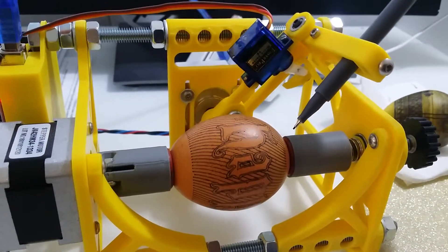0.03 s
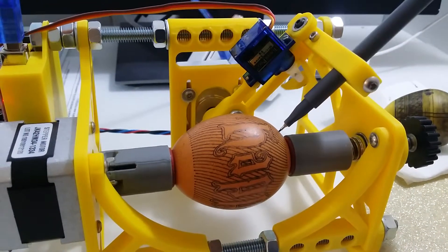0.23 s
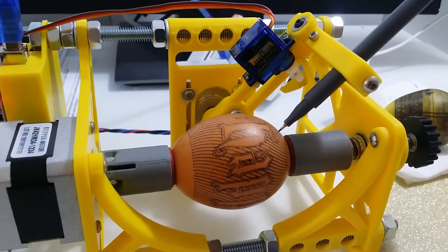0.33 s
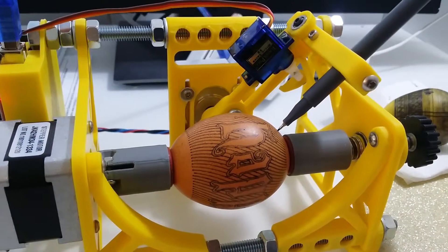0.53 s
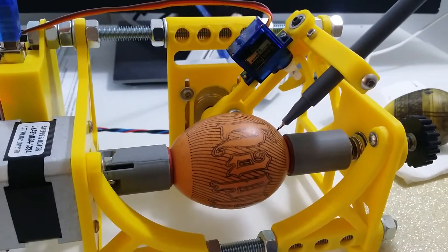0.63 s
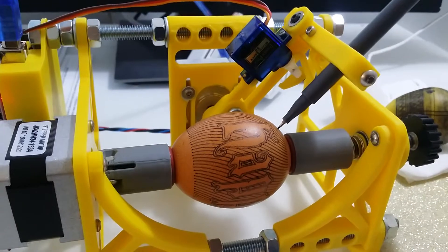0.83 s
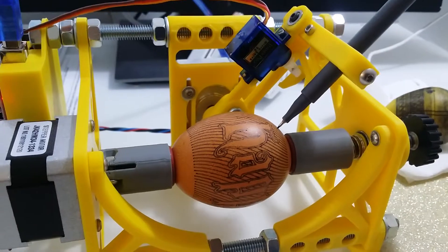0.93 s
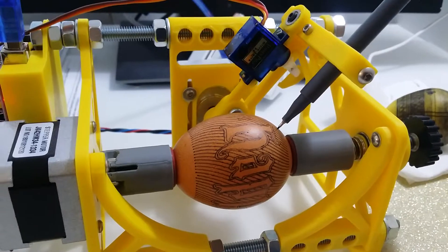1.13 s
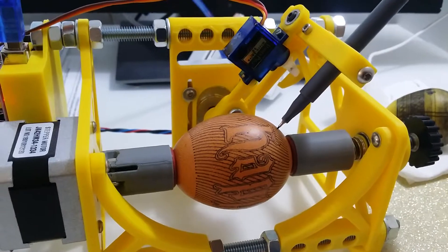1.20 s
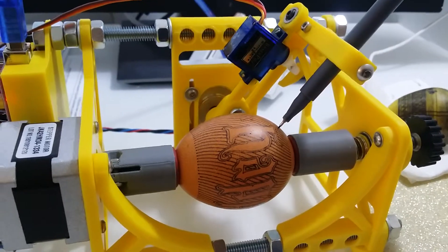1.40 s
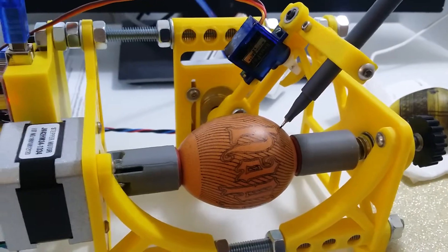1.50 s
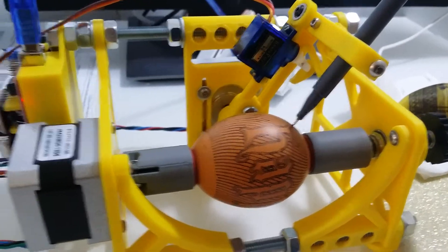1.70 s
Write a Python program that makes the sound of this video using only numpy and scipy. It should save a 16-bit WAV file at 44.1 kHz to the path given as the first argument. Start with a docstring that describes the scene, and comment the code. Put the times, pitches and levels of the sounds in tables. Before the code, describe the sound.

A little drawing machine's motors hum near the microphone. First comes a thin whine, then a quick gear buzz and a rattling thump as the pen lands, a short lull, and a steady two-note drone over quiet room hum.

```python
"""Drawing machine on an egg

A small plastic machine works close by on a table, over a steady hum like that of fans. One stepper
motor travels with the pen up, sounding harmonics of its step rate. A servo zips the pen down with
meshing gears; the arm thumps and bounces, exciting damped modes. After a pause two steppers draw
slowly together. An automatic gain control ducks at the zip and creeps back."""
import sys
import numpy as np
from scipy import signal
from scipy.fft import rfft, irfft
from scipy.io import wavfile
from scipy.ndimage import uniform_filter1d

SR = 44100
rng = np.random.default_rng(int(sys.argv[2]) if len(sys.argv) > 2 else 0)


def store_pcm(level_fs):
    """Save levels as 16-bit WAV."""
    pcm = np.round(np.clip(level_fs, -1, 1) * 32767).astype(np.int16)
    wavfile.write(sys.argv[1], SR, np.atleast_2d(pcm).T)


N = 77175
T = np.arange(N) / SR


def from_db(db):
    """The decibel scale: 20 dB is a factor of ten in amplitude."""
    return 10 ** (np.asarray(db) / 20)


def unit_rms(x):
    """Normalisation to a mean power of one."""
    return x / np.sqrt(np.mean(x ** 2) + 1e-20)


def pan(balance_db):
    """Constant-power panning; balance is the level of the left channel over the right."""
    ratio = from_db(np.atleast_1d(balance_db))
    return np.array([ratio, np.ones_like(ratio)]) * np.sqrt(2 / (1 + ratio * ratio))


def drift(corner_hz):
    """Random fluctuation: low-passed noise of unit power."""
    freqs = np.fft.rfftfreq(N, 1 / SR)
    return unit_rms(irfft(rfft(rng.standard_normal(N)) / (1 + (freqs / corner_hz) ** 2), N))


def decay(t60_s):
    """Exponential damping: the amplitude falls 60 dB in the time T60."""
    return np.exp(-np.log(1000) * T / t60_s)


def ring(force, hz, t60_s):
    """A damped oscillator, whose impulse response is a decaying sine."""
    radius, angle = np.exp(-np.log(1000) / (t60_s * SR)), 2 * np.pi * hz / SR
    return signal.lfilter([0, np.sin(angle)], [1, -2 * radius * np.cos(angle), radius ** 2], force + 1e-18)


def impulses(times_s, db):
    """Ideal impacts: a single sample at each time."""
    train = np.zeros(N)
    train[(times_s * SR).astype(int)] = from_db(db)
    return train


# Each row: frequency in Hz, correlation between the channels from 0 to 1.
COHERENCE = [(100, 1), (300, 0.67), (600, 0.42), (1200, 0.13), (3000, 0)]
def noise(spectrum):
    """Partly coherent stereo noise: long waves reach both ears alike, short ones do not."""
    log_f = np.log(np.fft.rfftfreq(N, 1 / SR) + 1)
    hz, db, balance_db = np.transpose(spectrum)
    coherence_hz, correlation = np.transpose(COHERENCE)
    coherence = np.interp(log_f, np.log(coherence_hz), correlation)
    mid, side = rfft(rng.standard_normal((2, N)))
    white = np.sqrt(1 + coherence) * mid + np.sqrt(1 - coherence) * side * [[1], [-1]]
    colour = from_db(np.interp(log_f, np.log(hz), db))
    balance = pan(np.interp(log_f, np.log(hz), balance_db))
    return irfft(white * colour * balance, N) * np.sqrt(SR) / 2


# The room's response. Each row: frequency in Hz, relative level in dB, balance in dB.
REVERB_SPECTRUM = [(100, 3, -0.5), (1950, 3.5, -0.5), (6540, -4.5, 9), (10400, -6.5, 9), (14000, -9, 6)]
def room(direct, wet_db, t60_s=.4):
    """Reverberation: convolution with a diffuse, dying tail, duller than the direct sound."""
    tail = noise(REVERB_SPECTRUM) * decay(t60_s)
    tail /= SR * np.sqrt(t60_s / np.log(1000) / 4)
    return direct + from_db(wet_db) * signal.fftconvolve(direct, tail, axes=1)[:, :N]


# Tones of the hum. Each row: frequency in Hz, level in dB.
HUM_TONES = [(120, -67.5), (149.6, -66.5), (186, -64), (221, -68.5), (256, -70.5), (294.1, -59)]
# Room air and hiss. Each row: frequency in Hz, density in dB per Hz, balance in dB.
AIR_SPECTRUM = [(20, -104, -5), (44.5, -98.5, 18), (90, -83, -2), (234, -86, -8), (550, -85.5, -2.5),
                (774, -90.5, -5.5), (1470, -93.5, -2), (1920, -92, -7), (2980, -104, 0.5), (4450, -102, -1),
                (7760, -104, 8), (11300, -107, -0.5), (16300, -107, 11)]
def background(waver_db=2.5):
    """Superposition: low tones, each wavering in level, lie over broadband air noise."""
    hum = np.zeros(N)
    for hz, db in HUM_TONES:
        amplitude = np.sqrt(2) * from_db(db + waver_db * drift(4))
        hum += amplitude * np.sin(2 * np.pi * hz * T + rng.uniform(0, 2 * np.pi))
    return pan(-3.5) * hum + noise(AIR_SPECTRUM)


def running(start_s, stop_s, rise_s=.026, fall_s=.008):
    """First-order response: a motor's amplitude rises, holds and dies away."""
    rise = 1 - np.exp(-np.maximum(T - start_s, 0) / rise_s)
    return rise * np.exp(-np.maximum(T - stop_s, 0) / fall_s)


def step_buzz(phase, step_hz, low_hz=2200, high_hz=9000, db_per_octave=-3.5, scatter_db=2):
    """Fourier series: the sharp edge of each step leaves a comb of uneven high harmonics."""
    orders = np.arange(low_hz // step_hz + 1, high_hz // step_hz)
    slope_db = db_per_octave * np.log2(orders / orders[0])
    cycle = np.arange(2048) / 2048
    channels = []
    for db in slope_db + scatter_db * rng.standard_normal((2, len(orders))):
        harmonics = np.sin(2 * np.pi * (np.outer(orders, cycle) + rng.random((len(orders), 1))))
        channels.append(np.interp(phase / (2 * np.pi), cycle, from_db(db) @ harmonics, period=1))
    return np.array(channels)


# Motor rasp in the frame. Each row: frequency in Hz, relative density in dB, balance in dB.
RASP_SPECTRUM = [(40.7, -112, 16), (120, -84.5, 4), (313, -89, -10), (584, -86.5, -0.5), (1050, -90, -7),
                 (1600, -101.5, 3), (1830, -86.5, -12), (2250, -99, -20), (2860, -102, 0), (4070, -99, -6),
                 (5630, -103, 1.5), (8800, -102, -2.5), (10300, -106, 0), (15500, -106, 5.5)]
# Throb of the rasp. Each row: multiple of the step rate, modulation depth.
RASP_MODULATION = [(1, 0.29), (2, 0.04), (5, 0.035), (6, 0.092)]
def stepper(harmonics, step_hz, rasp_db, buzz_db, speed_jitter=.0004, waver_db=.6, waver_hz=7):
    """Periodic forcing: the steps sound harmonics of their rate and amplitude-modulate a rasp."""
    phase = 2 * np.pi * np.cumsum(step_hz * (1 + speed_jitter * drift(waver_hz))) / SR
    throb = 1 + sum(depth * np.cos(order * phase) for order, depth in RASP_MODULATION)
    motor = from_db(rasp_db) * throb * noise(RASP_SPECTRUM)
    for order, db, balance_db, lead in harmonics:
        tone = np.sin(order * phase + rng.uniform(0, 2 * np.pi) + np.array([[lead], [0]]))
        motor += np.sqrt(2) * from_db(db + waver_db * drift(waver_hz)) * pan(balance_db) * tone
    return motor + from_db(buzz_db) * step_buzz(phase, step_hz)


# Each row: multiple of the step rate, level in dB, balance in dB, left phase lead in radians.
TRAVEL_HARMONICS = [(1, -63.5, -11, 0.36), (2, -62.5, 3, 0.68), (3, -60, -4.5, 0.48), (4, -56, -10, 1.74),
                    (5, -67.5, -19, 3.9), (7, -63, -25, 1.6), (8, -51.5, -12.5, 0.45), (9, -63, -7, 0.093)]
# Thin whistles of the motor. Each row: frequency in Hz, level in dB.
WHISTLE_TONES = [(1690, -65.5), (4226, -74), (4646, -75.5), (6067, -76), (6282, -83), (7585, -74),
                 (7800, -75)]
def travel():
    """Pitch follows step rate: the fast pen-up move sings higher, with pure whistles on top."""
    motor = stepper(TRAVEL_HARMONICS, step_hz=218.65, rasp_db=-1, buzz_db=-77)
    whistles = sum(from_db(db) * np.sin(2 * np.pi * hz * T + rng.uniform(0, 1.4, (2, 1)))
                   for hz, db in WHISTLE_TONES)
    return running(start_s=-.3, stop_s=.211) * (motor + np.sqrt(2) * whistles)


# The motors that swing the pen and turn the egg.
# Each row: multiple of the step rate, level in dB, balance in dB, left phase lead in radians.
PEN_HARMONICS = [(1, -59, -2.5, -0.75), (2, -66, 0, -0.5), (3, -70, -13, 6), (4, -61, -7.5, 0),
                 (5, -60, -14, 0.5), (7, -68.5, 0.5, 3.5), (8, -68.5, -12, 1.3), (9, -66.5, -8, 1.5),
                 (10, -65.5, -10, -2.5), (11, -74.5, 1, 2), (12, -70.5, -18, 4.5), (13, -71.5, 3, 1),
                 (14, -56.5, -16, 1), (15, -66, -13, -0.1), (16, -69.5, 4, 1.3)]
EGG_HARMONICS = [(1, -58.5, -2.5, -0.23), (3, -56.5, -6, -0.13), (4, -68.5, -6, 1), (5, -76, -4, 3),
                 (6, -74, 5, -1), (7, -67.5, 8, 0.55), (9, -65.5, -2, 2), (12, -73.5, -8, -3),
                 (13, -70, -8, 0.9), (16, -64, -1, -3)]
def drawing():
    """Two harmonic series: slow step rates in a ratio near 5:4 sound a major third."""
    pen_swing = stepper(PEN_HARMONICS, step_hz=131.12, rasp_db=-1.5, buzz_db=-77.5)
    egg_turn = stepper(EGG_HARMONICS, step_hz=104.62, rasp_db=-4.5, buzz_db=-83.5)
    return running(start_s=.612, stop_s=1.9) * (pen_swing + egg_turn)


# Contacts of the pen tip. Each row: start in seconds, relative level in dB.
TIP_STRIKES = [(0.2942, 3), (.3345, -4.5), (.9095, -14)]
# Colour of a tick. Each row: frequency in Hz, relative density in dB, balance in dB.
TICK_SPECTRUM = [(300, -75, 1), (2300, -75, -7), (3200, -92, 1), (5400, -74, -8), (9000, -83, -12),
                 (15000, -101, -3)]
def pen_ticks():
    """Hard impacts are broadband: the tip ticks on the shell as it lands, rebounds and once catches."""
    strikes = impulses(*np.transpose(TIP_STRIKES))
    return signal.fftconvolve(strikes, decay(t60_s=.033))[:N] * noise(TICK_SPECTRUM)


def contact_pulse(start_s, length_s):
    """A smooth force pulse of unit area: the longer the contact, the narrower its bandwidth."""
    progress = np.clip((T - start_s) / length_s, 0, 1)
    return np.sin(np.pi * progress) ** 2 * 2 / (length_s * SR)


# Low modes of frame and table. Each row: frequency in Hz, T60 in seconds, gain in dB.
FRAME_MODES = [(83, .26, -41), (111, 0.091, -36.5), (169, 0.12, -43.5), (244, 0.13, -34.5),
               (279.6, 0.1, -35.5), (362.6, 0.14, -42)]
def frame_thump(force, low_cut_hz=55):
    """Modal radiation: sound follows surface velocity, and a small frame radiates no deep bass."""
    velocity = np.zeros(N)
    for hz, t60_s, db in FRAME_MODES:
        displacement = from_db(db) * ring(force, hz, t60_s)
        velocity += np.diff(displacement, prepend=0) * SR / (2 * np.pi * hz)
    low_cut = signal.butter(3, low_cut_hz, "high", fs=SR, output="sos")
    return pan(-3) * signal.sosfilt(low_cut, velocity)


# Each row: frequency in Hz, T60 in seconds, gain in dB, balance in dB.
ARM_MODES = [(570, 0.025, -39.5, -23), (778, 0.031, -35.5, -1), (857, 0.036, -34.5, -12),
             (1120, 0.022, -43.5, -8), (1190, 0.14, -45.5, -22), (1973, 0.023, -41.5, -2),
             (2400, 0.024, -42, -1), (2586, 0.073, -48, -15)]
def arm_clack(strikes):
    """Free vibration: the struck arm rings briefly at its natural frequencies."""
    clack = np.zeros((2, N))
    for hz, t60_s, db, balance_db in ARM_MODES:
        gain = from_db(db + rng.normal(0, 1)) * rng.choice([-1, 1])
        clack += gain * pan(balance_db) * ring(strikes, hz, t60_s)
    return clack


# Each row: frequency in Hz, relative density in dB, balance in dB.
RATTLE_SPECTRUM = [(60, -105, 2), (307, -59.5, -7), (580, -74, -4), (900, -62.5, -2), (1040, -70.5, -5),
                   (1230, -65.5, -1), (1470, -76.5, -22), (2320, -73.5, -5), (2870, -80.5, 4),
                   (5060, -74, -16), (8100, -82.5, -8), (15000, -103, 6)]
def joint_rattle(strikes, rise_s=.0013, t60_s=.067):
    """Mechanical play: each blow shakes the loose joints into a decaying burst of noise."""
    burst = (1 - np.exp(-T / rise_s)) * decay(t60_s)
    return signal.fftconvolve(strikes, burst)[:N] * noise(RATTLE_SPECTRUM)


# Each row: start in seconds, contact length in seconds, push on the frame in dB, arm strike in dB.
ARM_BOUNCES = [(.2895, 0.0044, -11.5, -3), (.292, 0.0028, -12.5, -3), (.2982, 0.0031, 5, -3.5),
               (.332, 0.0029, -11, -10.5), (.3378, 0.0027, -1.5, -16), (.3546, 0.0044, -3, -14.5),
               (.392, 0.013, 0.5, -31)]
def pen_landing():
    """Impact excitation: each contact of the bouncing arm drives the frame, the arm and the joints."""
    times_s, _, _, strike_db = np.transpose(ARM_BOUNCES)
    strikes = impulses(times_s, strike_db)
    force = sum(from_db(db) * contact_pulse(start_s, length_s) for start_s, length_s, db, _ in ARM_BOUNCES)
    clatter = arm_clack(strikes) + joint_rattle(strikes)
    return room(frame_thump(force), wet_db=-16) + room(clatter, wet_db=-8.5)


def gear_squeak(start_s=.221, length_s=.015, from_hz=5300, to_hz=2900, db=-46):
    """Static friction gives way: a quick falling chirp as the gears break loose."""
    progress = np.clip((T - start_s) / length_s, 0, 1)
    hz = from_hz * (to_hz / from_hz) ** progress
    envelope = np.sqrt(np.abs(np.sin(np.pi * progress)))
    return from_db(db) * envelope * np.sin(2 * np.pi * np.cumsum(hz) / SR)


# Spectral envelope of the buzz. Each row: frequency in Hz, relative level of a harmonic in dB.
MESH_SPECTRUM = [(2000, -59), (2500, -53), (3100, -56), (4200, -50), (5300, -48), (9000, -51), (13000, -51),
                 (15000, -60)]
def gear_buzz(teeth_passed, mesh_hz):
    """Gear meshing: periodic tooth contact sounds high harmonics of the mesh frequency."""
    hz, db = np.transpose(MESH_SPECTRUM)
    buzz = np.zeros((2, N))
    for order in np.arange(hz[0] // mesh_hz + 1, hz[-1] // mesh_hz):
        amplitude = from_db(np.interp(order * mesh_hz, hz, db))
        buzz += amplitude * np.sin(2 * np.pi * (order * teeth_passed + rng.random((2, 1))))
    return pan(-9.5) * buzz


# Envelope of the zip. Each row: time in seconds, relative level in dB.
SERVO_ENVELOPE = [(.2205, -34), (.2225, -14), (.233, -10), (.239, -4), (.256, -1.5), (.265, -2),
                  (.271, -5.5), (.281, -1), (.290, -10.5), (.303, -42), (.315, -53)]
# The servo's case. Each row: frequency in Hz, T60 in seconds, relative level in dB, balance in dB.
CASE_MODES = [(4550, 0.019, -67, -10), (5570, 0.032, -46.5, 1), (6760, 0.021, -67, 0),
              (7530, 0.023, -41, -3), (7860, 0.049, -40, -10), (8600, 0.025, -43, -9),
              (9700, 0.024, -63, -16), (10830, 0.051, -37, -3), (11800, 0.023, -55, -11),
              (13000, 0.029, -58, -8)]
# Gear friction. Each row: frequency in Hz, relative density in dB, balance in dB.
FRICTION_SPECTRUM = [(600, -100, 2), (1540, -88, -14), (2440, -82, 1), (2960, -87, 5), (4280, -81, 2),
                     (5520, -69.5, -1.5), (7500, -68.5, -20), (9500, -68, -4), (11750, -70.5, -13),
                     (12200, -73.5, 6), (15800, -85, 4)]
def servo(start_hz=250, mesh_hz=440, spin_up_s=.008, speed_jitter=.006, tooth_scatter_db=1.2):
    """Forced vibration: tiny gears spin up and buzz, and their scraping teeth ring the case."""
    drive = from_db(np.interp(T, *np.transpose(SERVO_ENVELOPE), left=-np.inf, right=-np.inf))
    age_s = np.maximum(T - SERVO_ENVELOPE[0][0], 0)
    tooth_hz = mesh_hz + (start_hz - mesh_hz) * np.exp(-age_s / spin_up_s)
    teeth_passed = np.cumsum(tooth_hz * (1 + speed_jitter * drift(150))) / SR
    scrape = unit_rms(np.exp(-(teeth_passed % 1)) * from_db(tooth_scatter_db * drift(390)))
    tooth_force = scrape * rng.standard_normal(N)
    case = sum(from_db(db) * pan(balance_db) * unit_rms(ring(tooth_force, hz, t60_s))
               for hz, t60_s, db, balance_db in CASE_MODES)
    gears = drive * (gear_buzz(teeth_passed, mesh_hz) + scrape * noise(FRICTION_SPECTRUM))
    return room(gears + gear_squeak(), wet_db=-9) + room(drive * case, wet_db=-22)


def scene():
    """Linear superposition: the stepper moves, the pen's descent between them, and the hum."""
    return travel() + drawing() + servo() + pen_landing() + pen_ticks() + background()


def port_resonance(pressure, hz, width_hz, boost_db):
    """Acoustic resonance: a microphone port lifts one band of the treble."""
    b, a = signal.iirpeak(hz, hz / width_hz, fs=SR)
    return pressure + (from_db(boost_db) - 1) * signal.lfilter(b, a, pressure)


def gain_control(x, threshold_db=-38.5, slope=.38, attack_s=.14, release_db_per_s=1.5):
    """Dynamic compression: level above a threshold turns the gain down, and it recovers slowly."""
    power = uniform_filter1d(np.mean(x ** 2, axis=0), size=441)  # 10 ms average
    level_db = 10 * np.log10(np.abs(power) + 1e-12)
    cut_db = slope * np.maximum(level_db - threshold_db, 0)
    release_db = release_db_per_s * T
    held_db = np.maximum.accumulate(cut_db + release_db) - release_db
    pole = np.exp(-1 / (attack_s * SR))
    return x * from_db(-signal.lfilter([1 - pole], [1, -pole], held_db))


# Microphone ports, left then right. Each row: frequency in Hz, bandwidth in Hz, boost in dB.
MIC_PORTS = [(6573, 670, 13.5), (14630, 2200, 9.5)]
def record(dry, cutoff_hz=15600):
    """A signal chain in cascade: port resonances, gain control and a steep low-pass filter."""
    coloured = np.array([port_resonance(channel, *port) for channel, port in zip(dry, MIC_PORTS)])
    low_pass = signal.ellip(12, .2, 70, cutoff_hz, fs=SR, output="sos")
    return signal.sosfilt(low_pass, gain_control(coloured))


dry = scene()
out = record(dry)
store_pcm(out)
```